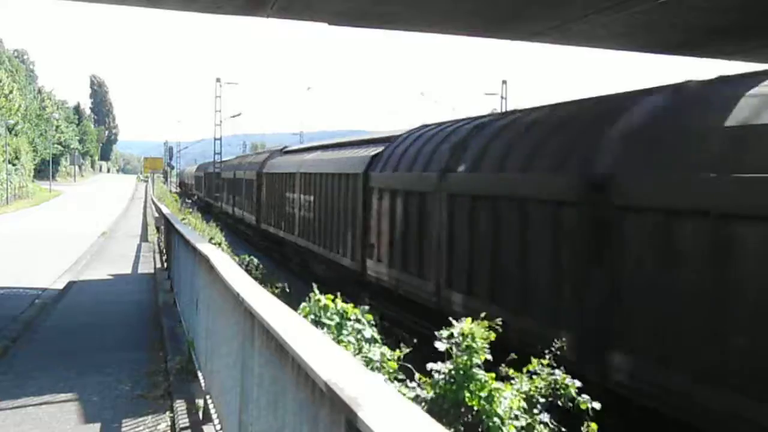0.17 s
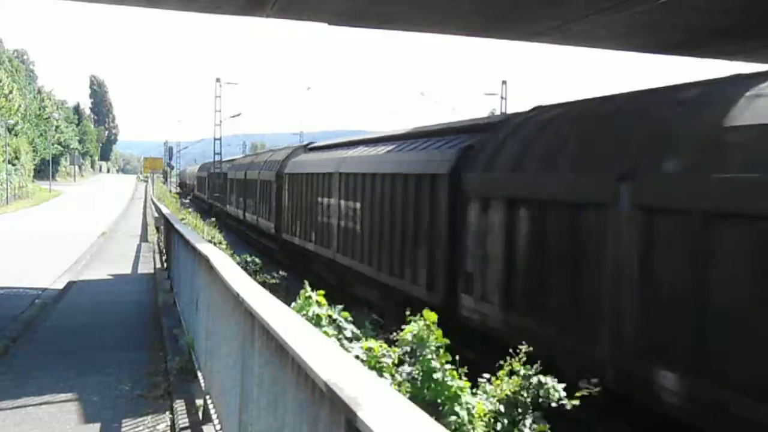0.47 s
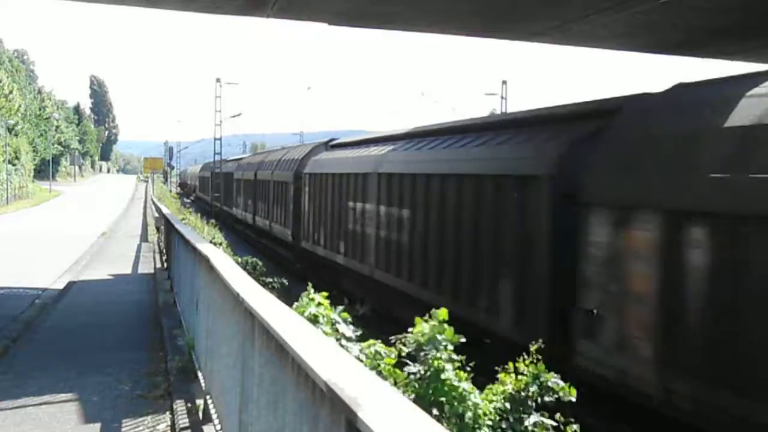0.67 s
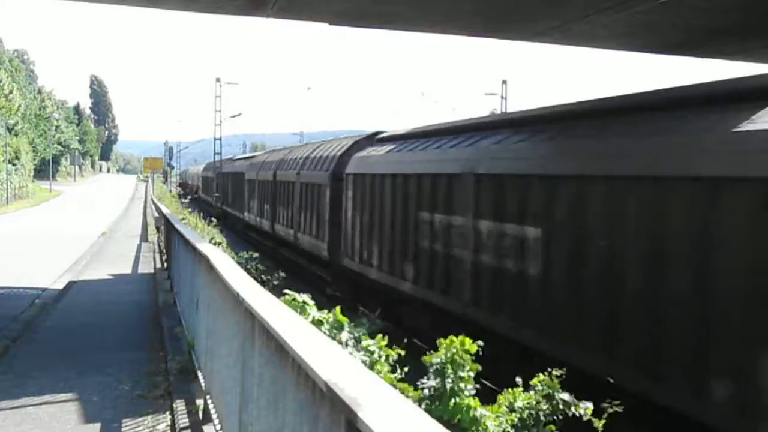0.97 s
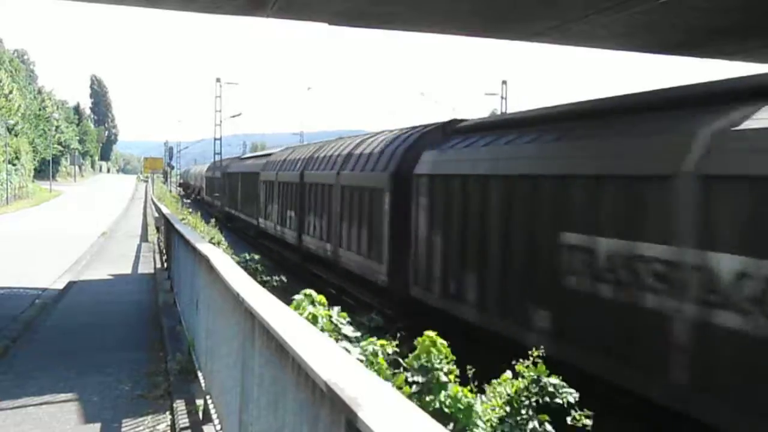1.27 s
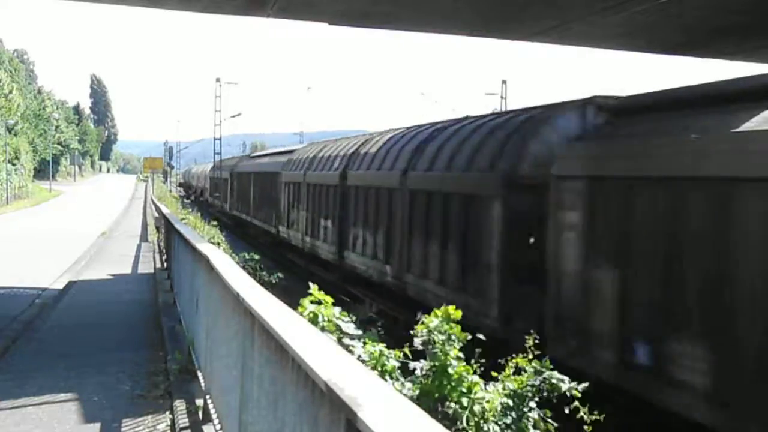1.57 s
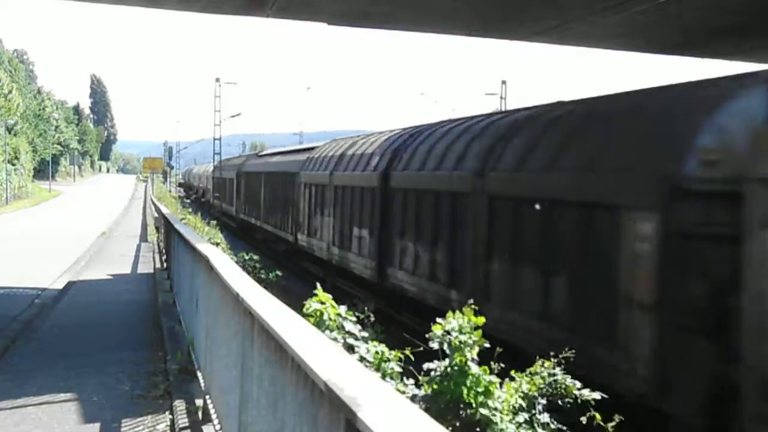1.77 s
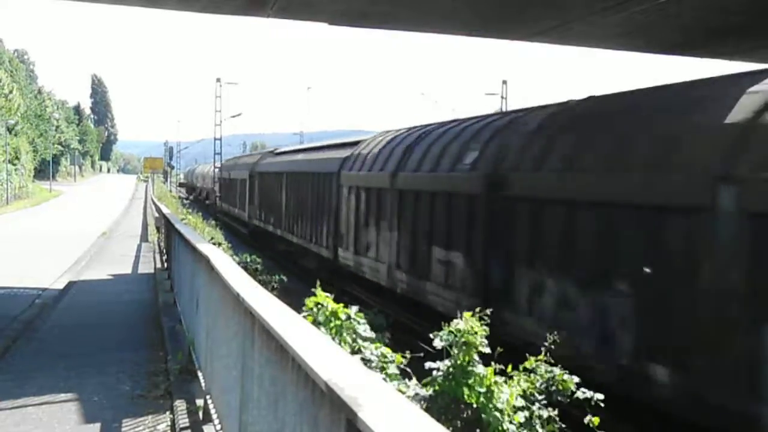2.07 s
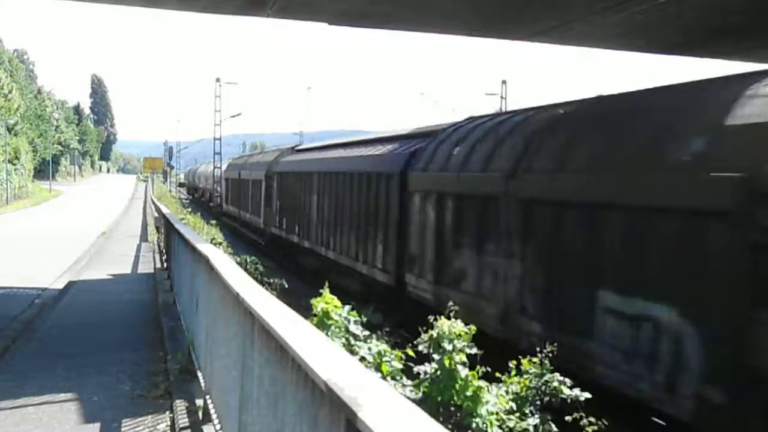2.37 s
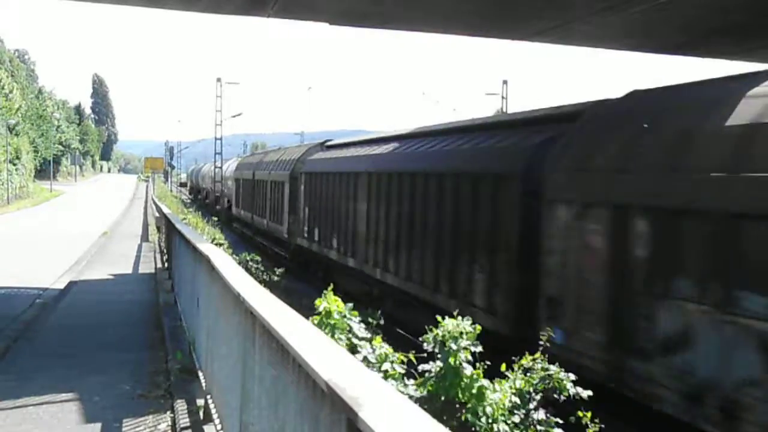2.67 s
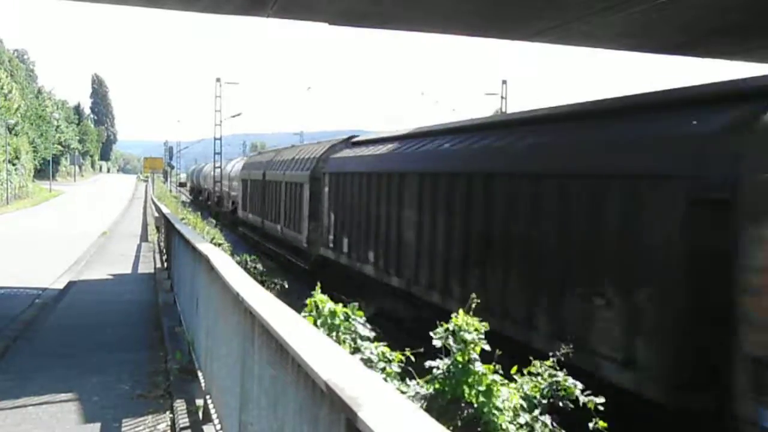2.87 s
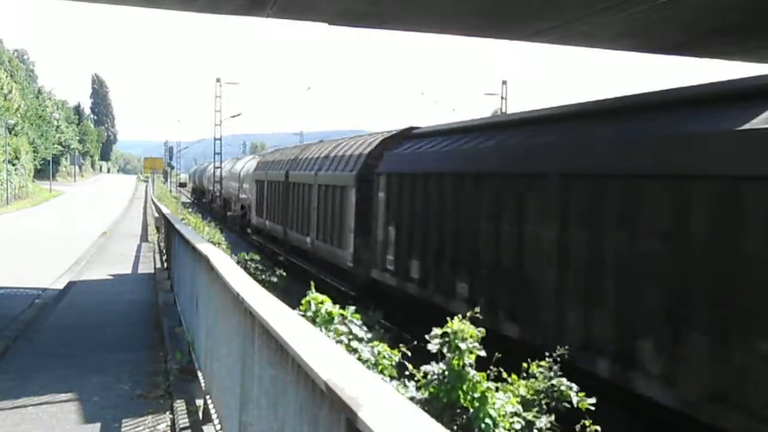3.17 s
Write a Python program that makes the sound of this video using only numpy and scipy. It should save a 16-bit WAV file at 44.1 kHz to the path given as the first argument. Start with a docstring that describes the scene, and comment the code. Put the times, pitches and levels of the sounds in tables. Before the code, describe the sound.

Steady roar of a passing freight train under a bridge, with metal rattles and gusts.

```python
"""Under a bridge, one microphone, close enough to a passing freight train to stand in its draught.
From the start, rough wheels shake rail and wheel discs into a steady roar and gusts buffet the microphone.
For the first 1.5 s loose iron clanks often on the wagons and rings on under the deck; from 0.8 s wheels
knock dully over bumps. Around 1.6 s later wagons deepen the rail's tone and the clanks thin out.
Towards the end, at 3.3 s, the draught eases and the roar swells a little."""
import sys
import numpy as np
from scipy import signal
from scipy.fft import rfft, irfft
from scipy.io import wavfile
from scipy.ndimage import uniform_filter1d

SR = 44100
rng = np.random.default_rng(int(sys.argv[2]) if len(sys.argv) > 2 else 0)


def store_wav(level_fs):
    """Save 16-bit WAV to argv[1]."""
    pcm = np.round(np.clip(np.atleast_2d(level_fs), -1, 1) * 32767)
    wavfile.write(sys.argv[1], SR, pcm.T.astype(np.int16))


N = 146412


def gain_of(db):
    return 10 ** (np.asarray(db) / 20)


def unit_rms(x):
    return x / np.sqrt(np.mean(x ** 2) + 1e-20)


def spectrum_db(points, hz):
    """Level at hz along (freq_hz, level_db) points, silent outside their ends."""
    freq_hz, level_db = np.transpose(points)
    return np.interp(np.log(hz + 1), np.log(freq_hz + 1), level_db, -150, -150)


def curve(table, column):
    """One column of a timed table, interpolated to every sample."""
    table = np.array(table)
    return np.interp(np.arange(N) / SR, table[:, 0], table[:, column])


def add(mix, start_s, sound):
    at = max(round(start_s * SR), 0)
    part = mix[at:at + len(sound)]
    part += sound[:len(part)]


def noise(spectrum, size, patchy_db, flicker_db):
    """Coloured noise at unit RMS, with drifting spectral patches and a flicker shared by all frequencies."""
    frames, hz = N // (size // 4) + 5, np.fft.rfftfreq(size, 1 / SR)
    real, imag, patches = rng.standard_normal((frames, len(hz), 3)).T
    patches = unit_rms(uniform_filter1d(uniform_filter1d(patches, size=8, axis=0), size=10, axis=1))
    flicker = unit_rms(uniform_filter1d(rng.standard_normal(frames), size=3))
    level_db = spectrum_db(spectrum, hz)[:, None] + patchy_db * patches + flicker_db * flicker
    _, sound = signal.istft((real + 1j * imag) * gain_of(level_db), nperseg=size, noverlap=size - size // 4)
    return unit_rms(sound[:N])


# Colours of the deep turbulence and of the quicker flutter: freq_hz, relative_db
TURBULENCE_SPECTRUM = [(3, -14.5), (8, -6), (14, -3.5), (27, -1), (45, -3), (70, -12.5), (110, -33)]
FLUTTER_SPECTRUM = [(25, -26), (50, -8), (80, -0.5), (130, -3), (200, -8), (300, -10.5), (450, -27)]
# Strength of the draught at the microphone: time_s, turbulence_db, flutter_db
DRAUGHT_LEVELS = [(0.0, -28, -32.5), (0.25, -32, -40), (0.46, -29.5, -41.5), (0.67, -28.5, -36),
                  (0.91, -30, -37), (1.15, -33, -39), (1.44, -33.5, -31), (1.75, -29.5, -33.5),
                  (1.98, -29.5, -29.5), (2.14, -33, -36), (2.47, -33, -36.5), (3.05, -35.5, -40.5),
                  (3.32, -41, -42)]
# Single eddies on the microphone: centre_s, peak_db, width_s, rebound_ratio
EDDIES = [(.113, -16, .0036, .3), (.188, -17, .006, .2), (.482, -20, .012, .4), (.581, -21, .01, .4),
          (.619, -20, .01, .2), (.697, -14, .0055, .15), (.84, -23, .006, .3), (1.393, -20, .003, .2),
          (1.451, -19, .003, .3), (1.533, -17, .0045, .8), (1.591, -22, .003, .3), (1.632, -16, .0032, .2),
          (1.753, -20, .005, .2), (2.015, -21, .0036, .3), (2.036, -21, .004, .3), (2.06, -17, .004, .2),
          (2.22, -20, .006, .3), (2.304, -20, .0024, .4), (2.602, -21, .005, .2)]


def draught():
    """The train's wind on the microphone: turbulence, flutter and eddies that suck the membrane in."""
    turbulence = noise(TURBULENCE_SPECTRUM, size=8192, patchy_db=0.8, flicker_db=0.5)
    flutter = noise(FLUTTER_SPECTRUM, size=2048, patchy_db=0.7, flicker_db=2.5)
    out = turbulence * gain_of(curve(DRAUGHT_LEVELS, column=1))
    out += flutter * gain_of(curve(DRAUGHT_LEVELS, column=2))
    for centre_s, peak_db, width_s, rebound_ratio in EDDIES:
        widths = np.arange(-.06, .06, 1 / SR) / width_s
        suction = (1 + rebound_ratio) * np.exp(-2.8 * widths ** 2)
        rebound = rebound_ratio * np.exp(-(widths / 2.5) ** 2)
        add(out, centre_s - .06, gain_of(peak_db) * (rebound - suction))
    return out


# The rail's wandering resonance: time_s, pitch_hz, level_db
RAIL_RESONANCE = [(0, 657, -34), (.45, 660, -34.5), (.65, 640, -31.5), (1., 640, -36.5), (1.3, 649, -30),
                  (1.6, 643.5, -39), (1.93, 557.7, -35.5), (2.05, 620, -27.5), (2.17, 600, -27.5),
                  (2.3, 643, -38), (2.6, 540, -31), (2.8, 670.3, -29), (3., 600, -34.5), (3.32, 619, -32)]


def rail_howl(width_hz=105):
    """Noise in one resonance of the rail, wandering in pitch as wheelsets pass."""
    pole = np.exp(-np.pi * width_hz / SR)
    white = rng.standard_normal(N) + 1j * rng.standard_normal(N)
    slow_noise = signal.lfilter([1], [1, -pole], signal.lfilter([1], [1, -pole], white))
    carrier = np.exp(2j * np.pi * np.cumsum(curve(RAIL_RESONANCE, column=1)) / SR)
    return gain_of(curve(RAIL_RESONANCE, column=2)) * unit_rms((slow_noise * carrier).real)


# Wheels striking bumps in the rail: start_s, relative_db, pitch_hz
RAIL_KNOCKS = [(0.785, -7.5, 635.4), (1.194, -9.5, 1286), (1.251, -13, 660), (2.069, -16, 810),
               (2.736, -9, 637), (2.832, -6.5, 660), (3.188, -27, 638)]


def rail_knocks(rise_s=0.0038, t60_s=0.054, trim_db=-1.5):
    """The rail gives a short dull ring when a wheel meets a bump."""
    out, t = np.zeros(N), np.arange(round(.1 * SR)) / SR
    for start_s, relative_db, pitch_hz in RAIL_KNOCKS:
        envelope = np.minimum(t / rise_s, 1) * gain_of(relative_db + trim_db - 60 * t / t60_s)
        add(out, start_s, envelope * np.sin(2 * np.pi * pitch_hz * t))
    return out


def deck_echo(sound, t60_s=0.41, rise_s=0.0089):
    """Reflections under the bridge deck: dense taps of random sign dying away."""
    t = np.arange(SR // 2) / SR
    taps = rng.standard_normal(len(t)) * gain_of(-60 * t / t60_s) * np.minimum(t / rise_s, 1)
    return signal.fftconvolve(sound, taps / np.linalg.norm(taps))[:N]


# Ringing modes of the loose iron: pitch_hz, relative_db, t60_s
IRON_MODES = [(3580, -1.5, .08), (4160, 6.5, 0.18), (4400, -21.5, .06), (4300, 6, .07), (4970, 5, .06),
              (5060, 2, 0.14), (5520, -7.5, .05), (6000, 1.5, .05), (6100, 6, 0.077), (6400, -6.5, .05),
              (7100, -36.5, .04)]


def clank(level_db, tilt_db_per_octave, decay_s, blows_per_s=4000, rise_s=.005, detune=.015, ring_db=-12.5):
    """A dense rattle of small blows, each a tick in the colour of the roar's treble plus a ring of iron."""
    t = np.arange(round(.15 * SR)) / SR
    size = 2 * len(t)
    hz = np.fft.rfftfreq(size, 1 / SR)
    scatter = rng.standard_normal(len(t))  # sets the force of the blows and the detuning of the modes
    struck = rng.random(len(t)) < blows_per_s / SR
    blows = scatter * struck * np.exp(-t / decay_s) * np.minimum(t / rise_s + 0.41, 1)
    modes = sum(gain_of(db - 60 * t / t60_s) * np.sin(2 * np.pi * pitch_hz * (1 + detune * scatter[k]) * t)
                for k, (pitch_hz, db, t60_s) in enumerate(IRON_MODES))
    ring = rfft(modes, size)
    ring = gain_of(ring_db) * ring / np.linalg.norm(ring) / (1 + (hz / 7300) ** 30)  # low-pass
    tick = gain_of(spectrum_db(TREBLE_SPECTRUM, hz)) / (1 + (3600 / (hz + 1)) ** 8)  # high-pass
    tick = tick / np.linalg.norm(tick) * np.exp(-2j * np.pi * hz * 0.00104)  # about 1 ms behind the ring
    tilt = gain_of(tilt_db_per_octave * np.log2(np.minimum(hz, 6800) / 4500 + 0.015))
    sound = irfft(rfft(blows, size) * (tick + ring) * tilt)
    return gain_of(level_db) * sound / np.sqrt(np.sum(sound ** 2) / (0.029 * SR))  # energy of 29 ms at level_db


# Clanks on the passing wagons: start_s, level_db, tilt_db_per_octave, decay_s
WAGON_CLANKS = [(.149, -28, -2, 0.024), (.272, -34, 6.5, 0.011), (.397, -33, 1, .012),
                (.418, -34, -1, 0.0081), (.538, -34, -2, 0.012), (.76, -29.5, -5, 0.014),
                (.795, -38, -10.5, .01), (.952, -39.5, 4, .008), (1.025, -36.5, 1, 0.0098),
                (1.09, -41.5, 0, 0.012), (1.162, -38, -3, .006), (1.25, -35.5, 2.5, .01),
                (1.47, -35, 5, 0.013), (2.083, -35, -9, .01), (3.19, -40.5, -3, 0.013),
                (3.295, -36, -16, 0.0091)]


def loose_iron(echo_db=2):
    """Loose couplings and doors clank; the deck overhead answers with three echo patterns in turn."""
    groups = np.zeros((3, N))
    for k, (start_s, level_db, tilt_db_per_octave, decay_s) in enumerate(WAGON_CLANKS):
        add(groups[k % 3], start_s, clank(level_db, tilt_db_per_octave, decay_s))
    return groups.sum(0) + gain_of(echo_db) * sum(deck_echo(group) for group in groups)


# Colour of the rail under the first wagons and, deeper, under the later ones: freq_hz, relative_db
EARLY_RAIL_SPECTRUM = [(88, -43), (150, -10.5), (254, -20.5), (312, -14.5), (487, -6), (643, -2.5),
                       (840, -4.5), (937, -5.5), (1310, -12), (1600, -14), (2080, -38), (3520, -120)]
LATE_RAIL_SPECTRUM = [(88, -34.5), (150, -13.5), (303, -14.5), (507, -1.5), (618, 0.5), (739, -3.5),
                      (901, -3.5), (1140, -14.5), (1250, -12.5), (1600, -14), (2080, -37), (3520, -120)]
# Colours of the wheel discs and of the roar's treble: freq_hz, relative_db
WHEEL_SPECTRUM = [(530, -31), (900, -1.5), (1150, -4), (1310, 2), (1630, -10.5), (1860, -2.5),
                  (2410, -13.5), (3040, -17.5), (3400, -13), (4420, -48), (7480, -120)]
TREBLE_SPECTRUM = [(1350, -16.5), (2300, -0.5), (2500, -7), (2850, -2.5), (3050, -10), (3370, -7),
                   (3880, -3), (4250, 2), (4830, -.5), (5400, -5), (6000, -9.5), (6800, -15), (7400, -20),
                   (8000, -35), (8300, -35), (8820, -45.5), (9300, -78)]
# The roar as it reaches the microphone: time_s, rail_db, wheel_db, treble_db
ROAR_LEVELS = [(0.0, -25, -28, -32), (0.4, -24.5, -26.5, -30), (0.83, -27, -27, -32.5),
               (1.21, -26, -27, -31), (1.38, -26, -27, -32.5), (1.76, -29, -30.5, -34.5),
               (1.96, -28, -29, -33.5), (2.14, -25, -29.5, -32.5), (2.42, -26.5, -29.5, -33.5),
               (2.74, -25, -28, -33), (3.01, -25, -28, -32.5), (3.32, -23.5, -25.5, -29.5)]


def rolling_roar(fade_centre_s=1.61, fade_length_s=0.57):
    """Roughness shakes rail and wheel discs into a roar; the rail's colour deepens as later wagons arrive."""
    fade = np.pi / 2 * np.clip((np.arange(N) / SR - fade_centre_s) / fade_length_s + .5, 0, 1)
    rail = np.cos(fade) * noise(EARLY_RAIL_SPECTRUM, size=1024, patchy_db=0.5, flicker_db=0.56)
    rail += np.sin(fade) * noise(LATE_RAIL_SPECTRUM, size=1024, patchy_db=0.44, flicker_db=0.9)
    wheel = noise(WHEEL_SPECTRUM, size=1024, patchy_db=1.5, flicker_db=-0.44)
    treble = noise(TREBLE_SPECTRUM, size=256, patchy_db=.6, flicker_db=.25)
    return sum(layer * gain_of(curve(ROAR_LEVELS, column))
               for column, layer in enumerate((rail, wheel, treble), start=1))


def scene():
    """The train and its draught, heard in mono from under the bridge."""
    return (rolling_roar() + rail_howl() + loose_iron() + rail_knocks() + draught())[None]


def record(dry, cutoff_hz=9050, dc_offset=-.0027):
    """The microphone chain cuts the top of the treble and adds a small offset."""
    lowpass = signal.firwin(511, cutoff_hz, window=("kaiser", 9), fs=SR)
    padded = np.pad(dry, ((0, 0), (255, 255)), "reflect")
    return signal.oaconvolve(padded, lowpass[None], "valid") + dc_offset


dry = scene()
out = record(dry)
store_wav(out)
```